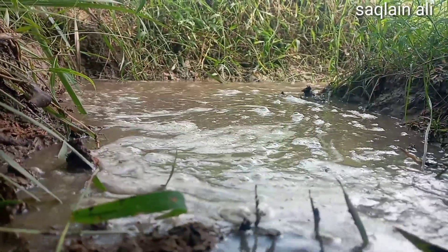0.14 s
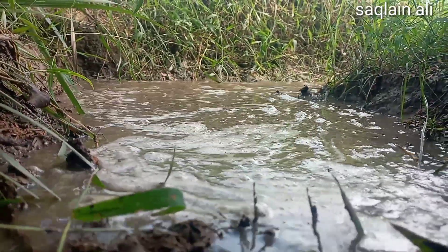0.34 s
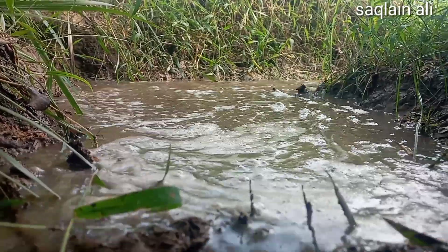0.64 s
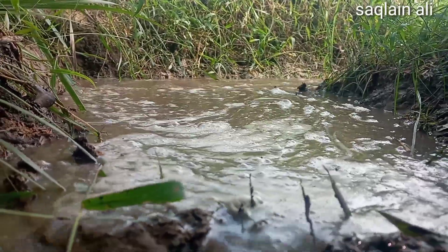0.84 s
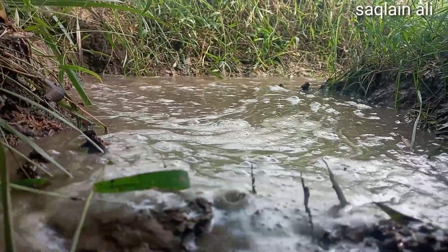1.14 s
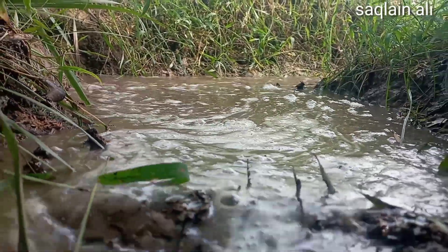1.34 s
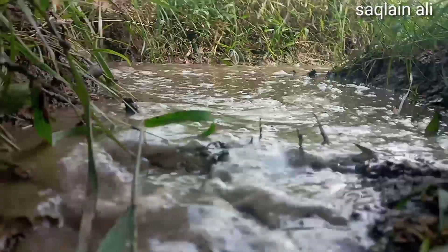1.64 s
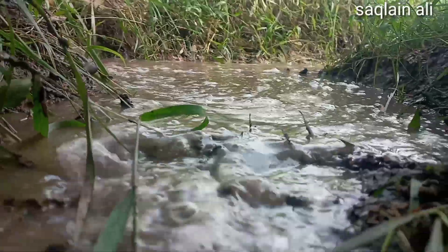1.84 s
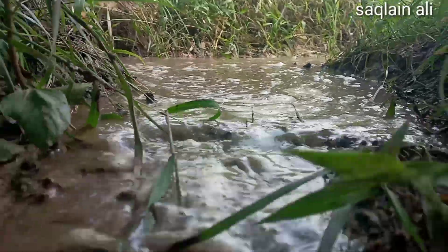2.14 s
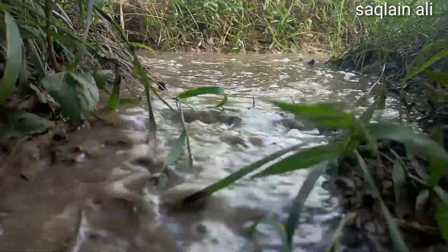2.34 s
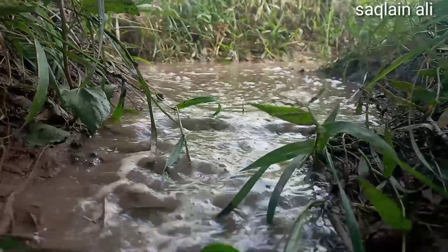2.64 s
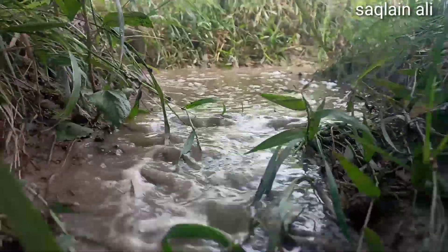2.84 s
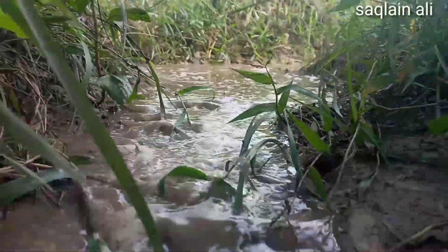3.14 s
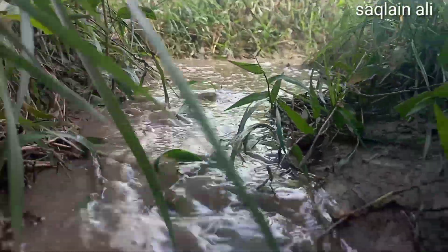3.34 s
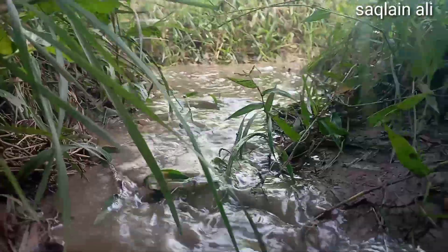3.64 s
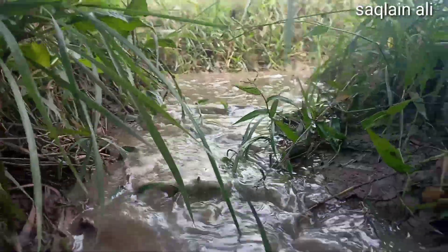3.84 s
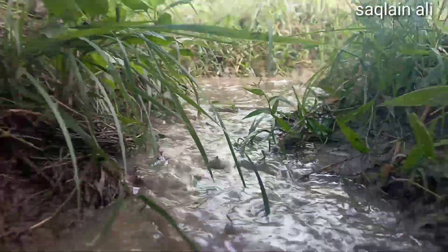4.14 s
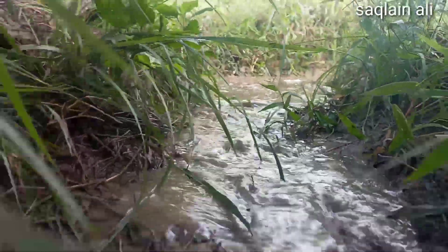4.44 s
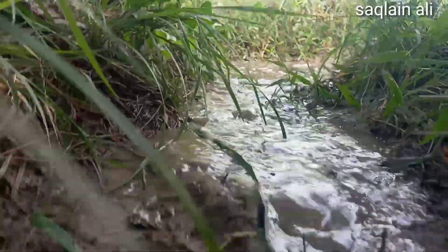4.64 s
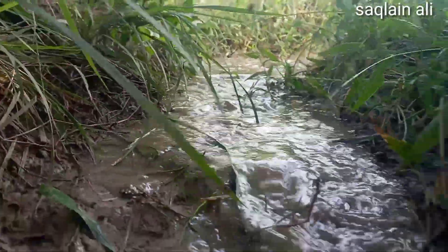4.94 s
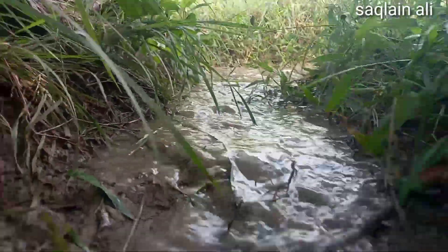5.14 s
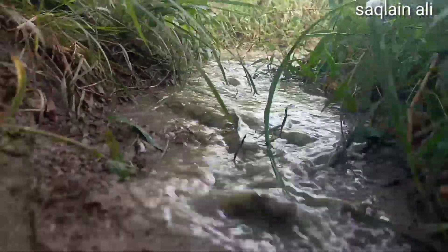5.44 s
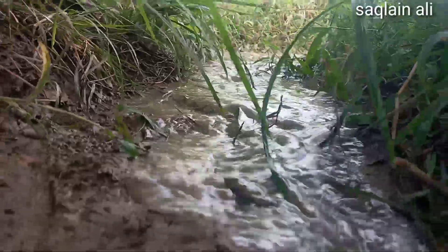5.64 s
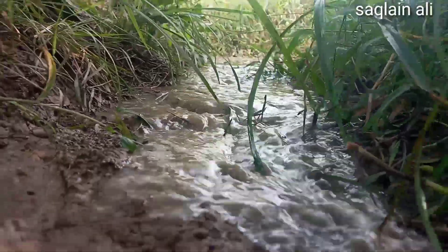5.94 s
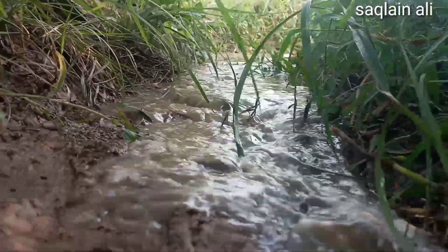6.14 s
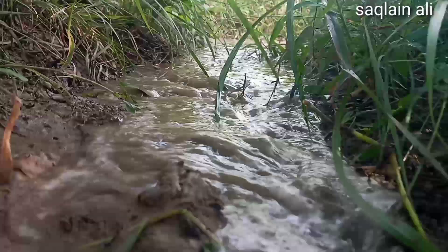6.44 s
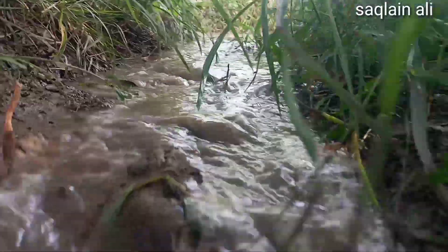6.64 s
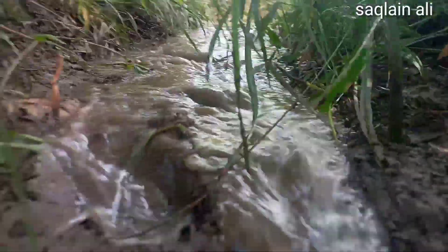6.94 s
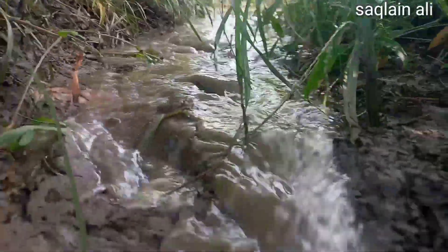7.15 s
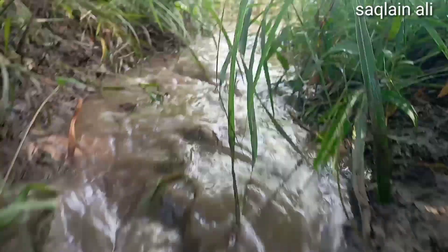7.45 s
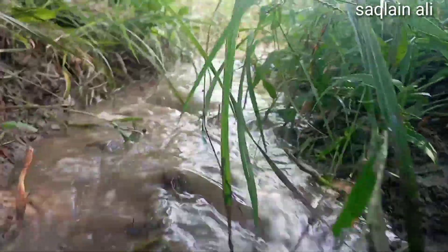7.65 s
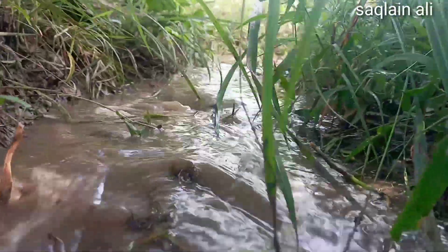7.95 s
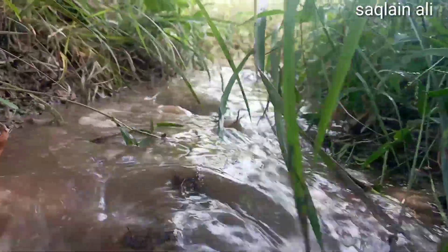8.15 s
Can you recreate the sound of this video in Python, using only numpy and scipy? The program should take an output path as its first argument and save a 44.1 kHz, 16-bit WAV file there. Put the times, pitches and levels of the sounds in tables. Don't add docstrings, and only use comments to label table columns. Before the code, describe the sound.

Outdoors beside a muddy field channel, a distant single-cylinder diesel pump chugs constantly, each low thud followed by a short hiss of gas. Close to the hand-held stereo phone, grass drags and crackles, mostly on the left, strongest between one and a half and five and a half seconds, with sharp stem ticks. Water is only a thin trickle. A small bird chirps early and again late, over faint pulsing insects.

```python
import sys
import numpy as np
from scipy import signal
from scipy.fft import rfft, irfft, next_fast_len
from scipy.io import wavfile
from scipy.ndimage import uniform_filter1d, map_coordinates

SR = 44100
rng = np.random.default_rng(int(sys.argv[2]) if len(sys.argv) > 2 else 0)


def magnitude_from_level(level_db):
    exponent = np.asarray(level_db, float) / 20
    return 10 ** exponent


def to_wav(sig):
    pcm = np.clip(np.atleast_2d(sig), -1, 1) * 32767
    pcm = np.round(pcm).astype(np.int16)
    wavfile.write(sys.argv[1], SR, pcm.T)


N = 365588

# [t/s, rate/firings per s]
ENGINE_SPEED = [(0, 7.396), (.829, 7.438), (1.658, 7.42), (2.487, 7.342), (3.316, 7.374), (4.145, 7.413),
                (4.974, 7.443), (5.803, 7.426), (6.632, 7.436), (7.461, 7.387), (8.29, 7.467)]
# [t/s, peak level/dB]
EXHAUST_LEVEL = [(0, -20.5), (2, -20.5), (3.3, -21), (5, -19.5), (7, -20), (8.29, -19.5)]
# [t/s, loss/dB]
FIRING_DIPS = [
    (1.662, -3.5),
    (4.237, -2.5),
    (4.775, -3.5),
    (7.604, -5.5),
]
# [delay/s, f/Hz, size, length/s]
BLOW = [
    (-.031, 190, -.17, .003),
    (-.027, 150, .2, .0037),
    (-.0146, 95, .09, .0056),
    (-.009, 160, .16, .0035),
    (-.0041, 320, .22, .0015),
    (0, 183, .97, .0037),
    (.0044, 210, -.27, .0012),
    (.0068, 185, .26, .0017),
    (.0136, 172, -.23, .0036),
    (.026, 205, .03, .0056),
]
# [delay/s, f/Hz, size, length/s]
PIPE_WALL = [
    (-.002, 501, 0.067, 0.0054),
    (0.012, 380, 0.0075, 0.045),
    (.004, 310, 0.048, 0.007),
]
# [f/Hz, level/dB]
GAS_COLOUR = [(700, -3), (1200, -17.5), (2500, -5.5), (4200, -1), (7000, -2), (10000, -7), (15000, -11)]
# [f/Hz, level/dB]
RUMBLE_COLOUR = [(15, -62), (25, -22.5), (96, 1), (193, -5), (268, -9), (347, -14), (523, -21),
                 (559, -17.5), (650, -89), (840, -82.5), (1430, -120)]

# [hardest t/s, build-up/s, fizz level/dB, body over fizz/dB, body left-right/dB]
BLADE_STROKES = [(.77, 0.15, -51, -6.5, 11.5), (1.15, 0.33, -48, -4, 18), (1.43, 0.2, -38.5, -9, 26),
                 (1.66, 0.057, -32, -14, 17), (1.8, 0.24, -37, -7, 13.5), (1.98, 0.15, -34, -11, 14),
                 (2.31, 0.25, -35.5, -11, 19), (2.528, 0.19, -37, -13.5, 16),
                 (2.749, 0.083, -38.5, -11, 5.5), (2.97, 0.16, -29.5, -8, 1), (3.2, 0.2, -40, -7.5, 11),
                 (3.36, 0.26, -36.5, -16, 27), (3.74, 0.33, -39.5, -10.5, 31), (4.06, 0.21, -40, -10.5, 23),
                 (4.308, 0.17, -30, -11, 14), (4.88, 0.27, -38.5, -11, 44), (5.08, 0.14, -43, -18.5, 36),
                 (5.24, 0.32, -31.5, -12.5, 37), (5.388, 0.16, -32.5, -13.5, 18),
                 (5.61, 0.32, -45, -10, 26), (6.05, 0.2, -44, -26, 11), (6.6, 0.34, -42.5, -21.5, 16),
                 (7.17, 0.21, -47, -6, 28), (8.14, 0.16, -54.5, 2.5, 15)]
# [hardest t/s, build-up/s, level/dB, left-right/dB]
STEM_THUMPS = [(0.02, 0.032, -49.5, 24), (.4, 0.056, -57, 7), (.72, 0.084, -53, 14.5), (1.3, 0.15, -57, 12),
               (1.44, 0.045, -44, 12), (1.56, 0.11, -43, 12.5), (1.76, 0.087, -45, 2),
               (2.0, 0.076, -50.5, 5), (2.21, 0.026, -44, 22), (2.88, .035, -52.5, -10),
               (2.98, 0.13, -37, -7.5), (3.08, 0.029, -40, -0.5), (4.3, 0.045, -54.5, 1.5),
               (4.52, 0.059, -72, 19), (5.07, 0.043, -42, 34), (5.28, 0.17, -52, 16),
               (7.19, 0.044, -47.5, 30)]
# [t/s, fizz level/dB]
GRASS_STIR = [(0, -56.5), (.3, -46), (.65, -52), (1.2, -49), (4.5, -50), (5.8, -49.5), (7.2, -49.5),
              (7.45, -51.5), (8.29, -55)]
# [f/Hz, level/dB]
THUMP_COLOUR = [(250, -47), (650, -2), (900, -7.5), (1300, -4.5), (1700, -24)]
BODY_COLOUR = [(600, -5.5), (1000, -6), (1500, 1), (3500, -2), (5000, -19), (9000, -40)]
FIZZ_COLOUR = [(1500, -32.5), (3000, -5.5), (4500, -5.5), (8000, -4.5), (15000, -4.5)]
# [t/s, peak level/dB, left-right/dB, f/Hz, t60/s]
STEM_SNAPS = [(2.223, -30, 25, 1990, 0.012), (2.876, -21.5, -11, 1670, 0.0088),
              (3.067, -22, -24, 1100, 0.02), (3.0717, -20, -20.5, 1500, 0.018),
              (3.0952, -17, -31, 1150, 0.019), (3.354, -32.5, 26, 2270, 0.042),
              (4.285, -23.5, 12, 3240, 0.0093), (4.53, -36, 24, 1120, 0.021),
              (7.4238, -25.5, 36, 2610, 0.0059)]
# [t/s, peak level/dB, left-right/dB, f/Hz, t60/s]
TIP_FLICKS = [(1.48, -28.5, 43, 1800, 0.028), (1.722, -20.5, 13, 2200, 0.0087),
              (2.929, -16.5, -8, 2430, 0.0022), (2.951, -30, -7, 1700, .0074),
              (3.044, -23, -27, 1260, 0.029), (3.268, -28, 14, 1520, 0.01), (4.326, -24.5, 13, 1430, 0.011),
              (4.33, -22, 10.5, 2270, 0.019), (4.345, -20.5, 5, 3500, 0.0084),
              (4.345, -26, 10, 1880, 0.011), (4.724, -28, 14, 3230, 0.0097), (4.792, -32, 19, 1690, 0.009),
              (5.071, -26.5, 29, 1230, 0.009), (7.182, -29.5, 27, 1490, 0.0081)]
# [t/s, peak level/dB, left-right/dB]
FIBRE_SPITS = [(1.5525, -25, 25), (1.6735, -19, 10), (1.6762, -22, 10), (1.7235, -23, 10), (2.544, -27, 11),
               (2.7675, -19, 8), (3.19, -29, 12), (3.201, -18, 12), (3.353, -21, 15), (3.4365, -25, 12),
               (3.622, -20, 12), (4.2725, -22, 12), (4.3145, -23, 12), (4.724, -23, 11), (4.7915, -23, 12),
               (4.834, -27, 11), (5.112, -25, 10), (7.586, -32, 30), (7.5882, -15, 30)]
# [t/s, peak level/dB]
LEAF_SQUEAKS = [(5.3944, -15), (5.4094, -16), (5.424, -11), (5.4321, -14.5), (5.4715, -27), (5.485, -11.5),
                (5.5, -16), (5.5588, -21), (5.5754, -24), (5.5934, -21)]
# [t/s, peak level/dB, left-right/dB, f/Hz]
STEM_TAPS = [(.016, -29, 40, 1900), (.0171, -15, 45, 1500), (.0209, -22, 42, 3000), (.0215, -39, 40, 1500),
             (.832, -29, 38, 2000), (.8351, -26, 38, 1900), (.8377, -19.5, 40, 2700),
             (.8383, -14.5, 38, 4200), (.8388, -28, 40, 2600), (.8395, -26, 38, 1200),
             (1.54995, -11, 37, 2600), (1.5524, -25, 30, 4500), (1.5533, -26, 30, 4000),
             (1.5686, -31, 25, 1900), (1.6713, -25, 11, 4500), (1.8577, -32, 20, 2600),
             (1.8599, -24, 27, 3200), (1.87, -25, 15, 4000), (3.0945, -22, -29, 5000),
             (7.4186, -40, 36, 1900), (7.4197, -35, 33, 3200), (7.422, -29, 41, 3600),
             (7.4225, -27, 38, 3200), (7.4341, -32, 35, 2800), (7.5767, -31, 30, 3800),
             (7.5879, -16, 41, 2200), (7.5884, -16, 44, 4600), (7.614, -36, 23, 2800)]

# [f/Hz, level/dB]
WATER_COLOUR = [(600, -10.5), (1200, -39), (2500, 1), (5000, -3.5), (9000, 21), (15000, -30)]
# [t/s, f/Hz, level/dB]
HOLLOW_NOTE = [(0, 1700, -84), (.5, 1872, -71.5), (1.2, 1510, -63), (3, 1552, -94), (6.5, 1916, -83),
               (6.85, 2000, -61.5), (7.05, 1480, -88.5), (7.2, 1338, -71), (7.4, 1390, -64),
               (7.7, 1518, -70.5), (7.85, 1547, -63), (8.0, 1516, -72.5), (8.1, 1543, -56.5),
               (8.29, 1480, -63.5)]
# [t/s, level/dB, f/Hz, second note level/dB]
BIRD_CHIRPS = [(0.5247, -46, 4080, 6.5), (0.783, -44.5, 3970, 4.5), (1.044, -46, 3990, 6.5),
               (1.325, -47, 3960, 6), (2.1206, -43.5, 4000, 6.5), (5.53, -44.5, 4100, 8.5),
               (5.7893, -47.5, 4070, 11), (6.0733, -45, 3990, 6.5), (6.3394, -44.5, 4000, 10),
               (6.6144, -45.5, 3990, 5.5), (6.8647, -46, 3820, -2)]
# [t/s, level/dB]
LOW_CHORUS = [(0, -52), (1.3, -53), (2.5, -48.5), (4.2, -53), (4.6, -56.5), (6, -52), (7, -54),
              (7.6, -51.5), (7.75, -48), (8.29, -56.5)]
# [t/s, f/Hz, level/dB]
HIGH_CHORUS = [(0, 9170, -62), (1, 9120, -60.5), (1.4, 9280, -52.5), (3, 9300, -63), (4.2, 9220, -54),
               (5.3, 9300, -55), (6.1, 9080, -53.5), (6.55, 9500, -50), (6.8, 9200, -59),
               (7.45, 9370, -52.5), (8.29, 9280, -51.5)]

# [f/Hz, level/dB]
LEFT_MIC = [(400, -6), (750, -12), (1400, -1), (3900, -1), (5200, 4), (6300, 10), (7400, 4), (8200, -4),
            (10500, -4), (13900, -10), (14600, -1), (15600, 0)]
RIGHT_MIC = [(400, -1), (750, -14.5), (1300, -10), (4000, -4.5), (6500, 0), (8100, -9), (9500, 3.5),
             (11000, -1), (13000, -10), (13800, -13.5), (14800, -10), (15500, 6)]
# [f/Hz, share]
HUSH_SHARE = [(450, 0), (650, .6), (1300, .65), (2200, .65), (3200, .55), (4500, .15), (6000, 0)]


def engine():
    fire = firings()
    lag_s = .0007

    def both_ends(hz):
        turn = np.pi * hz * lag_s
        return np.array([magnitude_from_level(4.0) * np.exp(-1j * turn), magnitude_from_level(1.23) * np.exp(1j * turn)])

    low = filtered(exhaust_thud(fire) + engine_rumble(fire), both_ends)
    return low + gas_puffs(fire) + pipe_note(fire)


def firings():
    first_s, scatter_db = .0457, 0.5
    (rate,), (level_db,) = curves(ENGINE_SPEED), curves(EXHAUST_LEVEL)
    cycles = np.cumsum(rate) / SR
    cycles_since_first = cycles - cycles[round(first_s * SR)]
    at = np.searchsorted(cycles_since_first, np.arange(cycles[-1] // 1 + 1))
    at = at[at < N]
    s = at / SR
    db = level_db[at] + scatter_db * rng.standard_normal(len(at))
    for dip_s, loss_db in FIRING_DIPS:
        db = db + loss_db * (abs(s - dip_s) < .5 / rate.mean())
    return np.transpose([s, db])


def uneven(fire):
    scatter_db = 2.5
    return fire + [0, scatter_db] * rng.standard_normal((len(fire), 1))


def blow_clock():
    lead = 3000
    return (np.arange(9000) - lead) / SR, lead


def exhaust_thud(fire):
    t, lead = blow_clock()

    def burst(delay_s, hz, size, length_s):
        u = t - delay_s
        return size * np.cos(2 * np.pi * hz * u) * np.exp(-(u / length_s) ** 2)

    thud = train(fire, sum(burst(*row) for row in BLOW), lead)
    for row in PIPE_WALL:
        thud = thud + train(uneven(fire), burst(*row), lead)
    return thud


def engine_rumble(fire):
    t, lead = blow_clock()
    swell = magnitude_from_level(-61.0) + magnitude_from_level(-26.0) * train(fire, np.exp(-((t - .01) / 0.05) ** 2), lead)
    middle, side = filtered(rng.standard_normal((2, N)), lambda hz: magnitude_from_level(along(RUMBLE_COLOUR, hz)))
    return swell * unit(middle + 0.2 * np.array([side, -side]))


def gas_puffs(fire):
    t, lead = blow_clock()
    opened = np.clip(t + 0.028, 0, None)
    decay = magnitude_from_level(-60 * np.clip(opened - .035, 0, None) / 0.26)
    puff = train(fire, (1 - np.exp(-opened / 0.009)) * decay, lead)
    flutter = magnitude_from_level(0.94 * wobble(40))
    return magnitude_from_level([[-11], [-22]]) * puff * flutter * heard(grit(0.84, rate=680), GAS_COLOUR)


def pipe_note(fire):
    t, lead = blow_clock()
    pulse = train(uneven(fire), np.exp(-((t - .002) / 0.012) ** 2), lead)
    return magnitude_from_level(-33.0) * pulse * narrow(1310, spread_rate=150)[0] * np.array([[1], [-.6]])


def grass():
    fizz_pan_db = 7
    fizz_rows = [(s, rise, db, fizz_pan_db) for s, rise, db, _, _ in BLADE_STROKES]
    body_rows = [(s, rise, db + over_db, pan_db) for s, rise, db, over_db, pan_db in BLADE_STROKES]
    stir = magnitude_from_level(curves(GRASS_STIR)[0])

    def resting(db, pan_db):
        return sides(db, pan_db)[:, None] * stir

    clumps = magnitude_from_level(1.5 * wobble(35))
    fizz_gain = strokes(fizz_rows, resting(0, fizz_pan_db))
    body = strokes(body_rows, resting(-9.5, 23)) * heard(grit(2.1, rate=600), BODY_COLOUR)
    thumps = strokes(STEM_THUMPS, resting(-13.5, 4)) * heard(grit(4.0, rate=290), THUMP_COLOUR)
    fizz = fizz_gain * heard(grit(2.9, rate=900), FIZZ_COLOUR)
    cracks_per_s = 160
    cracks = (rng.random((2, N)) < cracks_per_s / SR) * rng.standard_normal((2, N))
    crackle = magnitude_from_level(-9) * fizz_gain * heard(cracks, FIZZ_COLOUR)
    return clumps * (body + thumps + fizz + crackle)


def strokes(rows, rest):
    let_go_s, let_go_share = 0.041, 0.37
    hop = 64
    t = np.arange(0, N, hop) / SR
    power = rest[:, ::hop] ** 2
    for s, rise, db, pan_db in rows:
        width = np.where(t < s, rise, let_go_s + let_go_share * rise)
        swell = np.exp(-((t - s) / width) ** 2)
        power = power + (sides(db, pan_db)[:, None] * swell) ** 2
    return np.array([np.interp(np.arange(N) / SR, t, np.sqrt(p)) for p in power])


def ticks():
    spits = filtered(fibre_spits(), lambda hz: magnitude_from_level(along(LEFT_MIC[2:], hz) * .9 - 1))

    def casing(hz):
        return magnitude_from_level([along(LEFT_MIC[2:], hz) / 2, along(RIGHT_MIC[2:], hz) / 2])

    return filtered(stem_hits() + leaf_squeaks() + spits, casing)


def stem_hits():
    out, t = np.zeros((2, N + 900)), np.arange(900) / SR
    snap_scratch_db, flick_scratch_db = -13, -1.5
    hits = [(*row, snap_scratch_db) for row in STEM_SNAPS]
    hits += [(*row, flick_scratch_db) for row in TIP_FLICKS]
    for s, db, pan_db, hz, t60, scratch_db in hits:
        draw = rng.standard_normal(len(t))
        slips = np.cumsum(draw) * 0.17
        decay = magnitude_from_level(-60 * t / t60)
        onset = 1 - np.exp(-hz * t * np.clip(.016 / t60, 1, 8))
        ring = np.sin(2 * np.pi * hz * t + slips) * decay * onset
        rough = draw - np.roll(draw, shift=3)
        scratch = magnitude_from_level(scratch_db - 10.0) * rough * (decay + 0.072 * magnitude_from_level(-60 * t / 0.034))
        place(out, s, sides(db + 3.5, pan_db)[:, None] * (ring + scratch))
    return out[:, :N]


def fibre_spits():
    out, t = np.zeros((2, N + 900)), np.arange(900) / SR
    t60 = .005
    for s, db, pan_db in FIBRE_SPITS:
        draw = rng.standard_normal(len(t))
        burst = (draw - np.roll(draw, 2)) / 2 * magnitude_from_level(-60 * t / t60)
        place(out, s, sides(db + 1, pan_db)[:, None] * burst)
    return out[:, :N]


def leaf_squeaks():
    out, t = np.zeros((2, N + 900)), np.arange(900) / SR
    for s, db in LEAF_SQUEAKS:
        thin = np.diff(rng.standard_normal(len(t)), n=3, prepend=[0] * 3) / 4
        place(out, s, sides(db - 9.5, 28)[:, None] * thin * magnitude_from_level(-60 * t / 0.078))
    return out[:, :N]


def taps():
    out, t = np.zeros((2, N + 400)), np.arange(400) / SR
    sag = .9
    hardest, spread = .45, .65
    for s, db, pan_db, hz in STEM_TAPS:
        cycles = np.log1p(sag * hz * t) / sag
        push = np.sin(2 * np.pi * cycles) * np.exp(-((cycles - hardest) / spread) ** 2)
        place(out, s, sides(db + 1, pan_db)[:, None] * push)
    return out[:, :N]


def water():
    trickle = magnitude_from_level([[-47], [-55]]) * magnitude_from_level(1.8 * wobble(7.2)) * heard(grit(1.6, rate=450), WATER_COLOUR)
    hz, db = curves(HOLLOW_NOTE)
    db = db + 2 + 3 * wobble(14)
    return trickle + sides(db, 14 * np.ones(N)) * narrow(hz, spread_rate=380)


def bird():
    lead_s = .04
    out, t = np.zeros((2, N)), np.arange(6000) / SR - lead_s
    for s, db, hz, second_db in BIRD_CHIRPS:
        first = np.exp(-((t - .003) / 0.027) ** 2) * np.sin(2 * np.pi * hz * (t - 0.34 * t * t))
        u = t - .04
        falling = np.sin(2 * np.pi * 1.28 * hz * (u - 2.0 * u * u))
        second = magnitude_from_level(second_db) * np.exp(-(u / 0.033) ** 2) * falling
        place(out, s - lead_s, magnitude_from_level(db) * np.array([first, second]))
    hoarse = np.array([[.6 + wobble(340), wobble(900)] for _ in "LR"])
    first_note = sides(0.78, 13.0)[:, None] * hoarse[:, 0] * out[0]
    second_note = sides(-0.33, 13)[:, None] * hoarse[:, 1] * out[1]
    return first_note + second_note


def insects():
    (low_db,), (high_hz, high_db) = curves(LOW_CHORUS), curves(HIGH_CHORUS)

    def pulses(rate):
        return 1 + .5 * np.sin(2 * np.pi * np.cumsum(rate + 4 * wobble(4.3)) / SR)

    low_gain = sides(low_db + 1.5 + 1.6 * wobble(12), 13 * np.ones(N))
    high_gain = sides(high_db - 3 + 1.5 * wobble(8), 3 * np.ones(N))
    low = low_gain * pulses(52) * narrow(5820, spread_rate=420)
    high = high_gain * pulses(57) * narrow(high_hz, spread_rate=260)
    return low + high


def unit(x):
    return x / np.sqrt(np.mean(x ** 2, axis=-1, keepdims=True) + 1e-20)


def along(points, hz):
    f, v = np.transpose(points)
    return np.interp(np.log(hz + 1), np.log(f + 1), v)


def curves(rows):
    s, *cols = np.transpose(rows)
    return [np.interp(np.arange(N) / SR, s, c) for c in cols]


def wobble(rate):
    knots = rng.standard_normal(int(N * rate / SR) + 4)
    return map_coordinates(knots, [np.arange(N) * rate / SR])


def filtered(x, response):
    m = next_fast_len(N + 8192)
    return irfft(rfft(x, m) * response(np.fft.rfftfreq(m, 1 / SR)), m)[..., :N]


def heard(x, colour):
    def response(hz):
        mics = np.array([along(LEFT_MIC, hz), along(RIGHT_MIC, hz)])
        return magnitude_from_level(along(colour, hz) + mics)

    return unit(filtered(x, response))


def sides(db, pan_db):
    share = 1 / (1 + magnitude_from_level(-2 * pan_db))
    return 2 * magnitude_from_level(db) * np.sqrt([share, 1 - share])


def grit(grain_db, rate):
    sizes = np.clip(rng.standard_normal((2, int(N * rate / SR) + 2)), -3, 2.2)
    grain = (np.arange(N) * rate / SR).astype(int)
    x = rng.standard_normal((2, N)) * magnitude_from_level(grain_db * sizes[:, grain])
    z = signal.stft(x, nperseg=512)[2]
    patches = uniform_filter1d(rng.standard_normal(z.shape[1:]), size=4, axis=0)
    patches = uniform_filter1d(patches, size=6, axis=1)
    return signal.istft(z * magnitude_from_level(3.0 * patches / patches.std()), nperseg=512)[1][:, :N]


def narrow(hz, spread_rate):
    phase = 2 * np.pi * np.cumsum(hz * np.ones(N)) / SR
    sine, cosine = np.sin(phase), np.cos(phase)
    return unit(np.array([wobble(spread_rate) * sine + wobble(spread_rate) * cosine for _ in "LR"]))


def train(rows, shape, lead):
    marks = np.bincount(np.round(rows[:, 0] * SR).astype(int), magnitude_from_level(rows[:, 1]), N)
    return signal.fftconvolve(marks, shape)[lead:lead + N]


def place(out, s, sound):
    start = round(s * SR)
    out[:, start:start + sound.shape[1]] += sound


def hushed(x):
    memory_frames, deepest_db = 19, -12
    hz, _, z = signal.stft(x, SR, nperseg=1024, noverlap=768)
    power = np.abs(uniform_filter1d(np.abs(z) ** 2, size=memory_frames, axis=2)) + 1e-20
    floor = uniform_filter1d(np.percentile(power, 12, axis=2), size=9, axis=1)[..., None]
    gain = np.clip(1 - along(HUSH_SHARE, hz)[:, None] * floor / power, magnitude_from_level(deepest_db), 1)
    return signal.istft(z * gain, SR, nperseg=1024, noverlap=768)[1][:, :N]


def scene():
    return engine() + grass() + ticks() + taps() + water() + bird() + insects()


def low_pass(x):
    return signal.sosfilt(signal.butter(12, 16860, fs=SR, output="sos"), x)


def record(dry):
    low_hz, top_hz = 31.2, 15620
    ceiling = .7
    kept = filtered(dry, lambda hz: (hz < top_hz) / (1 + (low_hz / (hz + 1)) ** 3))
    kept = hushed(kept)
    mix = kept / (1 + np.abs(kept / ceiling) ** 4) ** .25
    return low_pass(mix)


dry = scene()
out = record(dry)
to_wav(out)
```